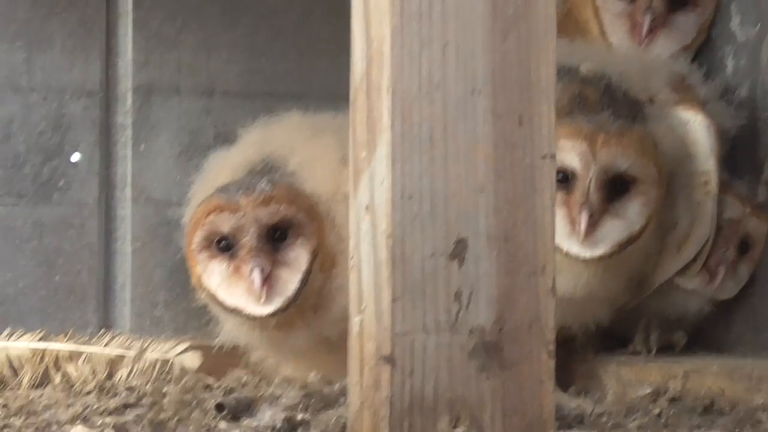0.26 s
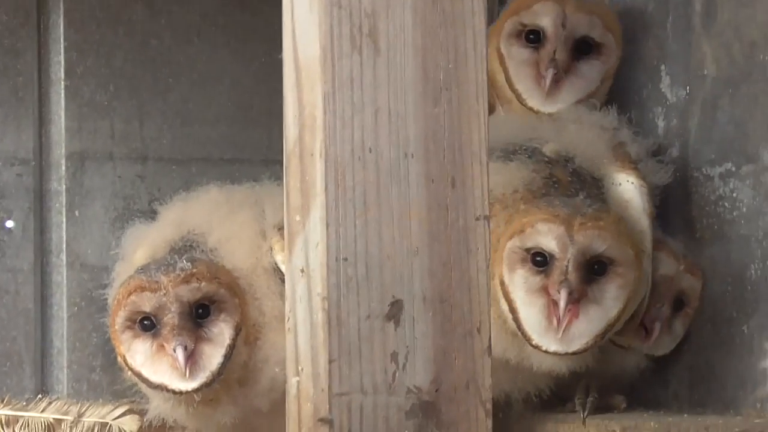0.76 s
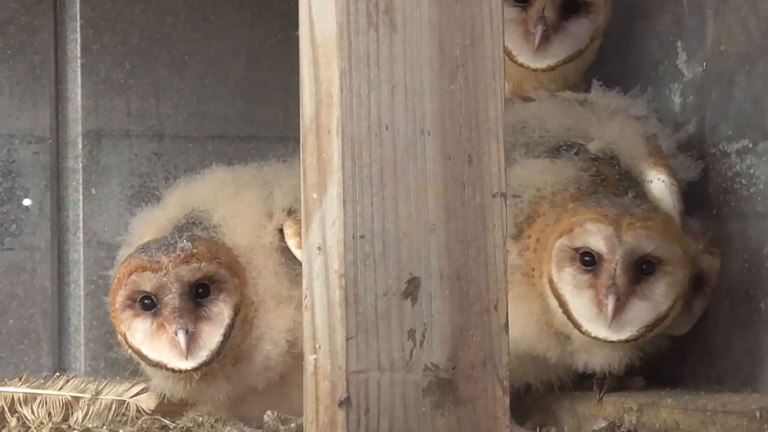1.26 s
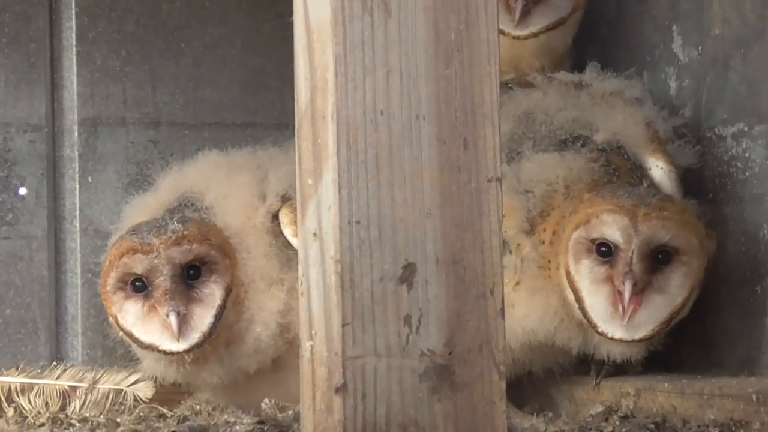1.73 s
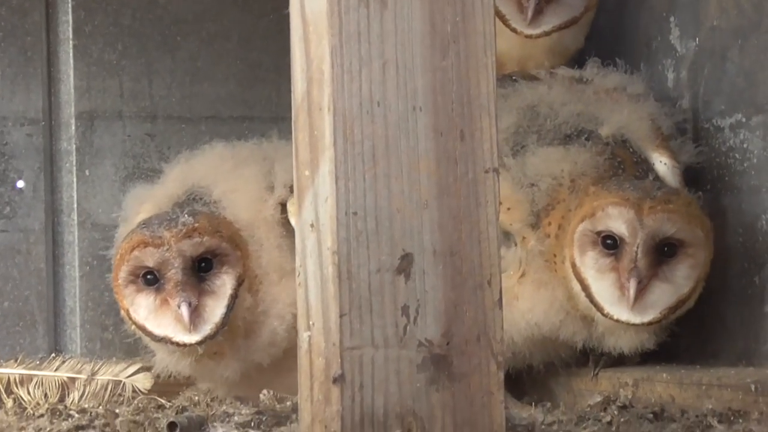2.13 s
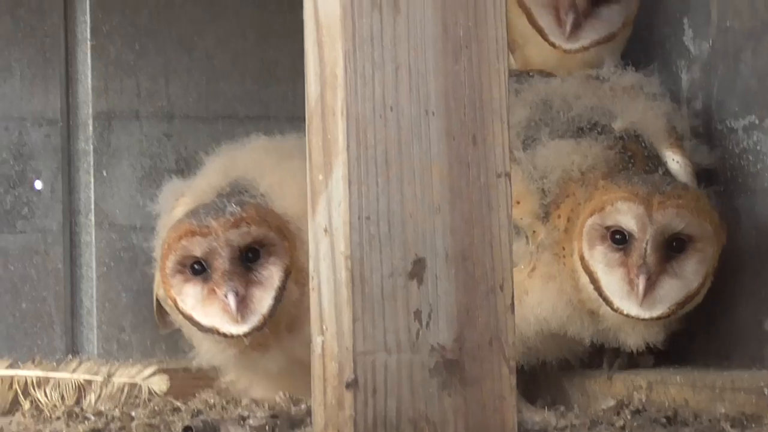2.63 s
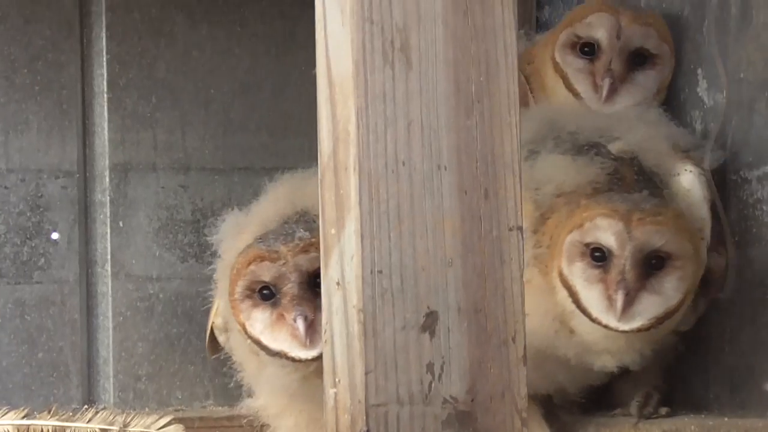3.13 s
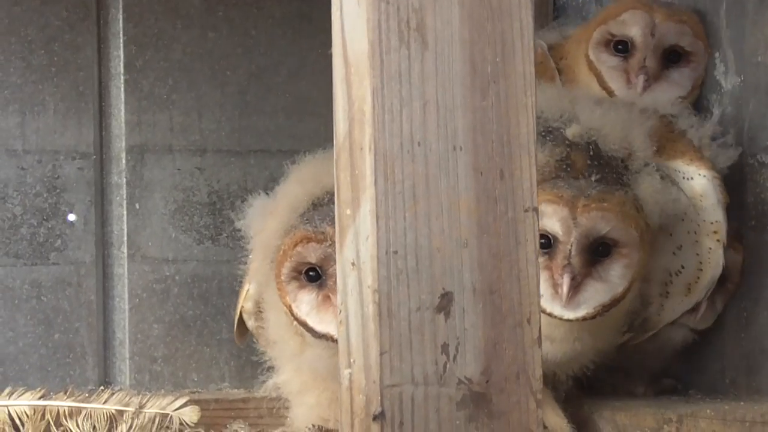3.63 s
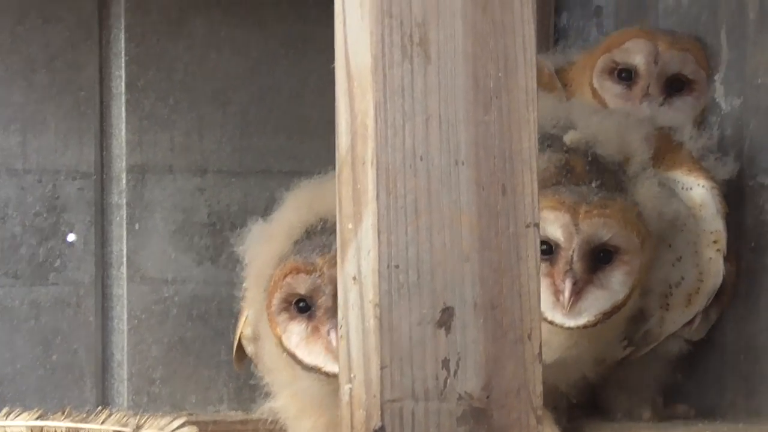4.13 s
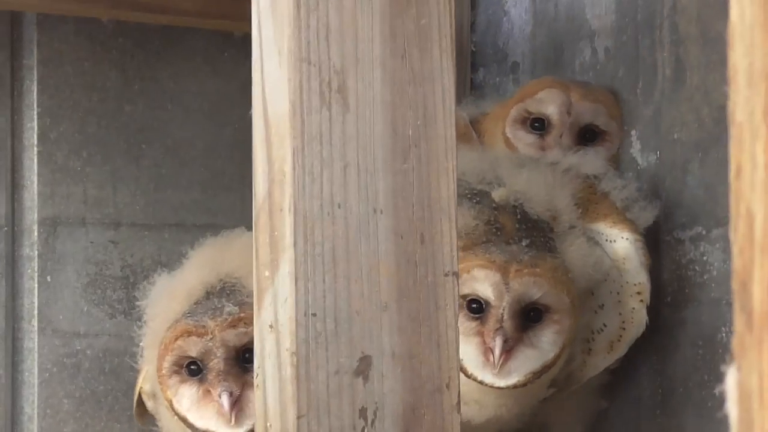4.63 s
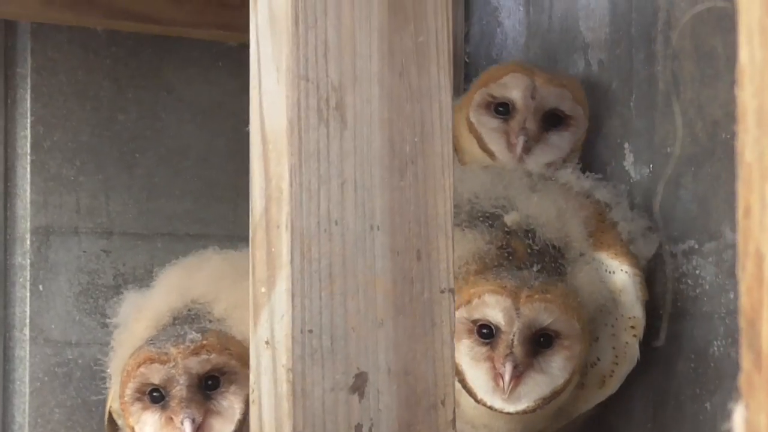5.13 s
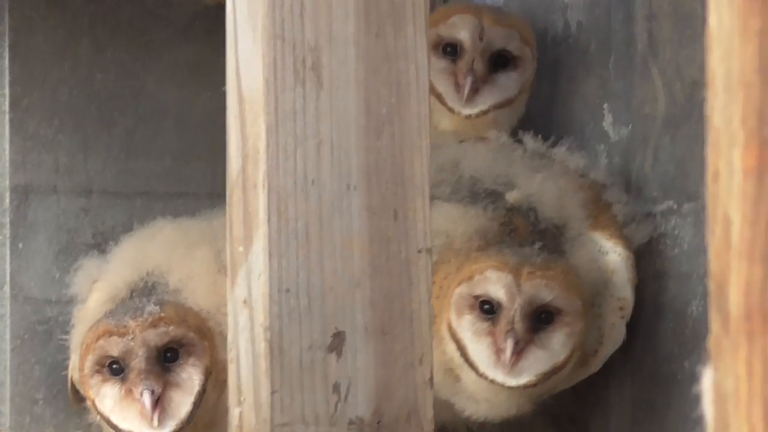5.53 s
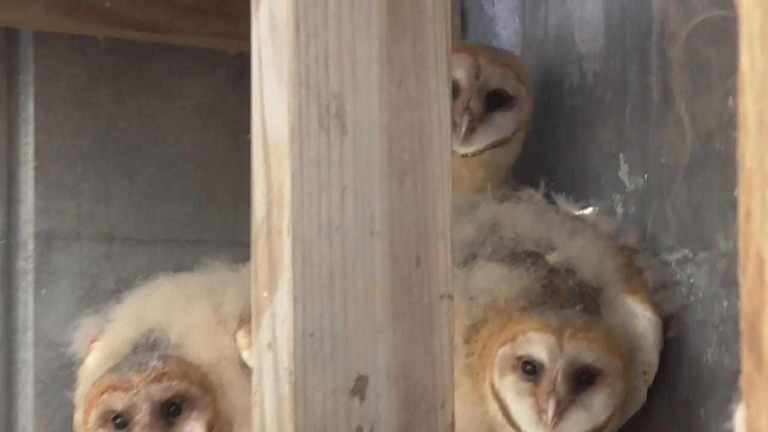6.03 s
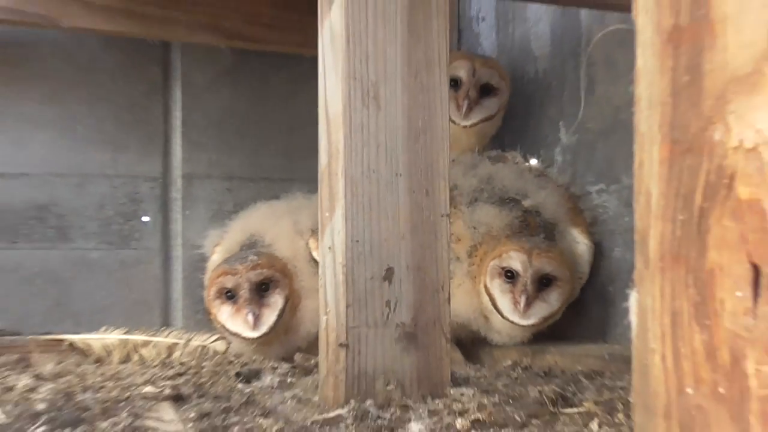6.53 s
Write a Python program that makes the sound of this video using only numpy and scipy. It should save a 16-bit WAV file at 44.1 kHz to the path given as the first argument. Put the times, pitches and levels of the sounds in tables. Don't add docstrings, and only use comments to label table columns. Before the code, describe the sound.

Raspy, airy hissing from several owlets fills a boarded space almost without pause; a beak clacks early on while low wind buffets bump underneath.

```python
import sys
import numpy as np
from scipy import signal
from scipy.fft import irfft
from scipy.io import wavfile
from scipy.ndimage import uniform_filter1d

SR = 44100
rng = np.random.default_rng(int(sys.argv[2]) if len(sys.argv) > 2 else 0)


def waveform_to_disk(signal):
    frames = np.transpose(np.atleast_2d(signal))
    scaled = np.clip(frames, -1, 1) * 32767
    samples = np.round(scaled).astype(np.int16)
    wavfile.write(sys.argv[1], SR, samples)


def boost_factor(decibels):
    exponent = np.asarray(decibels, float) / 20
    return 10 ** exponent


N = 298557
FRAME, HOP = 1024, 256
HZ = np.fft.rfftfreq(FRAME, 1 / SR)
CLOCK = np.arange(N // HOP + 5) * HOP / SR


def evened(x):
    return x / np.sqrt(np.mean(x ** 2) + 1e-20)


def read(points, hz):
    f, value = np.transpose(points)
    return np.interp(np.log(hz + 1), np.log(f + 1), value)


def noise(magnitude):
    a, b = rng.standard_normal((2, *magnitude.shape))
    white_rms = np.sqrt(FRAME / 3)
    x = signal.istft(((a + 1j * b) * magnitude).T, nperseg=FRAME, noverlap=FRAME - HOP)[1]
    return x * np.sqrt(SR / 2) / white_rms


def steady(points):
    return noise(boost_factor(read(points, HZ)) * np.ones((len(CLOCK), 1)))[:N]


def bump(hz, width_hz, shift):
    return (1 + ((HZ - hz * shift[:, None]) / width_hz) ** 2 * 1.88) ** -2


def drift(count, frames, bins):
    field = rng.standard_normal((count, len(HZ)))
    return evened(uniform_filter1d(uniform_filter1d(field, frames, 0), bins, 1))


# freq [Hz], level [dB]
WALL_HZ_DB = [(300, -12), (640, -11.5), (1400, 4.5), (2500, -8), (4500, -0.5), (7000, -3), (9000, 1.5),
              (12000, -9), (15500, 1)]


def echoes(count):
    t60_s, first_s = 0.13, .002
    t = np.arange(6000) / SR
    taps = rng.standard_normal((count, len(t))) * boost_factor(-60 * t / t60_s) * (t > first_s)
    hz = np.fft.rfftfreq(8192, 1 / SR)
    colour = np.fft.fftshift(irfft(boost_factor(read(WALL_HZ_DB, hz))))[4096 - 128:4096 + 129]
    return signal.oaconvolve(taps / np.linalg.norm(taps[0]), colour[None], "same")


def shared_echoes():
    back_s, back_db = .00625, -15
    side, centre = echoes(count=2)
    centre = 0.78 * centre
    centre[round(back_s * SR)] += boost_factor(back_db + 5)
    return np.array([centre + side, centre - side]) * 0.54


def hut(x, pan_db, echo_db, shared):
    huddle_hz = 2500
    low = signal.butter(2, huddle_hz, "low", fs=SR)
    high = signal.butter(2, huddle_hz, "high", fs=SR)
    own = signal.lfilter(*high, echoes(count=2))
    taps = boost_factor(echo_db) * (own + signal.lfilter(*low, shared))
    taps[:, 0] += boost_factor(np.array([pan_db, -pan_db]) / 2)
    return signal.oaconvolve(x[None], taps, axes=1)[:, :N] / np.sqrt(1 + boost_factor(2 * echo_db))


# freq [Hz], level [dB per Hz]
AIR_HZ_DB = [(20, -108), (60, -102), (120, -102), (190, -81), (500, -90), (2500, -100), (3300, -90.5),
             (8000, -104), (16000, -118)]


def still_air():
    return np.array([steady(AIR_HZ_DB) for _ in "lr"])


def eddies(gusts):
    count, gain_db, spread_db, share_db = 200, 0.2, 2.0, -11
    low_hz, high_hz = 95, 150
    place, size, pitch = rng.random((count, 3)).T
    at = ((np.arange(count) + place) / count * (N - 1)).astype(int)
    level_db = 20 * np.log10(gusts[at]) + gain_db + spread_db * (2 * size - 1)
    pitch_hz = low_hz + (high_hz - low_hz) * pitch
    return [(i / SR, db, hz, share_db) for i, db, hz in zip(at, level_db, pitch_hz)]


# centre_s [s], level_db [dB], pitch_hz [Hz], in_step_share_db [dB]
PUFFS = [(0.048, -27, 112, -5), (0.261, -27, 156, -7), (0.289, -21.5, 143, -3.5), (0.428, -29, 113, -5.5),
         (0.518, -24, 140, -11), (0.562, -27, 110, -7), (0.576, -18, 159, -5), (0.644, -28.5, 170, 1.5),
         (0.736, -19, 110, -6.5), (0.772, -26, 110, -4.5), (3.138, -29, 133, -13), (3.324, -22, 148, -16),
         (4.107, -23, 87, -20), (4.142, -16, 118, -21), (4.159, -26, 96, -10), (4.334, -27, 125, -13),
         (4.613, -26.5, 140, -9), (4.692, -25, 113, -17), (4.98, -26, 114, -15), (5.192, -14, 99, -17),
         (5.211, -18, 146, -11), (5.236, -9, 143, -7.5), (5.725, -25, 127, -8), (5.754, -16, 131, -17),
         (5.775, -12, 167, -11.5), (5.804, -25, 121, -4), (5.88, -24, 109, -9), (5.898, -21, 91, -12),
         (6.021, -26, 97, -14), (6.481, -16.5, 154, -7.5)]
# centre_s [s], level_db [dB], half_length_s [s]
GUSTS = [(0.05, -30, .06), (0.267, -23.5, 0.065), (0.455, -34, 0.046), (0.595, -27.5, 0.085),
         (.75, -24, 0.032), (1.1, -37, 0.092), (1.3, -43.5, .13), (2.522, -47, 0.078), (2.95, -44, 0.037),
         (3.16, -32.5, 0.056), (3.37, -33, .06), (3.647, -47, 0.075), (4.115, -31, .06), (4.29, -32, 0.072),
         (4.64, -30, 0.12), (4.928, -35.5, 0.094), (5.26, -27, 0.087), (5.505, -37.5, 0.072),
         (5.769, -20, 0.038), (5.97, -30, 0.13), (6.223, -45, 0.061), (6.494, -19.5, 0.027),
         (6.698, -45, 0.21)]
# freq [Hz], level [dB per Hz]
BUFFET_HZ_DB = [(20, -27), (55, -2), (90, 29), (130, 0), (180, 16.5), (250, 9), (400, -67), (700, -30)]


def wind():
    calm_db, puff_cycles, reach_s = -61, 1.12, .05
    rumble_db = np.array([[-4], [-13.5]])
    lump_depth_db = np.array([[4.6], [2.5]])
    t = np.arange(N) / SR
    lumps = rng.standard_normal((2, N))
    for _ in range(2):
        lumps = signal.lfilter([1], [1, -.997], lumps)
    gusts = boost_factor(calm_db) + sum(boost_factor(db) * np.exp(-((t - s) / half_s) ** 2) for s, db, half_s in GUSTS)
    rumble = np.array([evened(steady(BUFFET_HZ_DB)) for _ in "ab"])
    apart, alike = gusts * boost_factor(lump_depth_db * evened(lumps)) * rumble * boost_factor(rumble_db)
    puffs = list(PUFFS) + eddies(gusts)
    for (s, db, hz, share_db), turn in zip(puffs, rng.random((len(puffs), 2))):
        at = slice(max(round((s - reach_s) * SR), 0), round((s + reach_s) * SR))
        u = t[at] - s
        angle = 2 * np.pi * (hz * u * (1 + 9.6 * u * (turn[0] - .5)) + turn[0])
        skew = np.where(u < 0, .6, .8)
        shape = np.exp(-(u * hz / (skew * puff_cycles)) ** 2)
        crest = 0.41 * shape * np.cos(2 * angle) + 0.058 * shape ** 2 * np.cos(3 * angle)
        apart[at] += boost_factor(db - 0.5) * shape * (np.cos(angle) + crest)
        detuned = np.cos(1.068 * angle + 2 * np.pi * turn[1])
        alike[at] += boost_factor(db + 1.0 + share_db) * shape * (detuned + 0.63 * crest)
    limit = .6
    return limit * np.tanh(np.array([alike + apart, alike - apart]) / limit)


# pitch_hz [Hz], level_db [dB], t60_s [s]
SNAP_RING = [(700, -8, .025), (1100, 0, .009), (1290, -12, .04), (2266, -8, .005), (4100, -1, .004)]
# delay_s [s], level_db [dB]
SNAP_ECHOES = [(.0028, -9), (.0062, -8), (.0085, -8), (.0122, -9), (.017, -12), (.021, -15)]


def snap():
    start_s, peak_db = .8907, -5
    t, x = np.arange(3000) / SR, np.zeros(N)
    ring = sum(boost_factor(db - 60 * t / t60_s) * np.cos(2 * np.pi * hz * t) for hz, db, t60_s in SNAP_RING)
    onset = np.minimum(t / .00015 + .3, 1)
    clap = -boost_factor(peak_db) * ring / ring[0] * onset
    dull = np.convolve(clap, np.hanning(14) / 6.5, "same")
    x[round(start_s * SR):][:len(t)] = clap
    for delay_s, db in SNAP_ECHOES:
        x[round((start_s + delay_s) * SR):][:len(t)] += boost_factor(db) * dull
    return x


def opened(hz, gape):
    return gape ** np.interp(hz, (10800, 12000), [1, 0])


# time_s [s], effort_db [dB]
HISSES = [
    [(0, 2), (.5, 2), (.7, 1), (.8, -1.5), (.9, -0.5), (.94, -31)],
    [(0, 0.5), (.9, 2.5), (1.3, 0.5), (2.1, 2), (2.8, -5), (4.2, -2), (5.6, 3), (5.8, -8.5), (5.9, -38)],
    [(2, -30), (2.14, -7), (2.3, 0), (2.5, 0.5), (2.85, 2.5), (3.1, 1.5), (3.38, 0), (3.42, -10),
     (3.5, -40)],
    [(2.3, -29), (2.8, -7), (3.2, -6), (4.4, -5), (5.1, 0.5), (6.2, 2), (6.32, 1.5), (6.38, -3.5),
     (6.42, -47)],
    [(3.3, -10), (3.55, -7.5), (4.2, 1), (4.8, 3), (5.4, 1.5), (6, -0.5), (6.4, 0), (6.8, 1)],
    [(2.9, -33), (3.2, 0), (3.5, 5), (3.9, 3), (4.3, 0), (4.6, 2), (4.9, -24)],
]
# share_db [dB], share slope [dB/dB], stretch [factor], stretch slope [1/dB]
NECKS = [(1.5, -.5, 1.03, -0.07), (1, -0.85, .98, 0.0141), (1, -1.3, 0.78, 0.5), (1.5, -0.47, 1.09, 0.05),
         (-2, -0.86, 0.987, 0.12), (1, -1, 0.925, 0.05)]
# before [factor], after [factor], from_s [s], until_s [s]
GAPES = [(1.004, 1.01, 0.3, .9), (.975, 1.025, .9, 2.2), (.99, 1.04, 2.5, 3.3), (0.958, 0.988, 4, 6.3),
         (0.955, 0.988, 4.2, 5.7), (0.97, 0.963, 3.2, 4.6)]
# pitch_hz [Hz], width_hz [Hz], level_db [dB per Hz]
WINDPIPES = [
    [(1210, 280, -68), (1430, 610, -70), (2220, 250, -70)],
    [(273, 310, -75), (629, 164, -62.5), (1220, 250, -67.5), (2295, 286, -69)],
    [(775, 830, -72.5), (1320, 410, -73), (1970, 150, -80)],
    [(810, 880, -74), (1324, 510, -66), (1750, 400, -71.5)],
    [(417, 380, -67.5), (1170, 420, -76.5), (2090, 180, -76)],
    [(1407, 140, -64.5)],
]
# pitch_hz [Hz], width_hz [Hz], level_db [dB per Hz]
FIRST_BEAKS = [
    [(3900, 1500, -76.5), (5400, 740, -77.5), (6660, 540, -67.5), (7240, 300, -60.5), (8620, 560, -63.5),
     (9520, 850, -61), (10400, 1100, -68), (11500, 920, -62.5), (13800, 500, -73), (14700, 620, -77.5)],
    [(3500, 2500, -88), (4140, 880, -81.5), (5620, 1300, -81.5), (7490, 390, -76), (9370, 210, -69),
     (9650, 640, -66), (11220, 730, -70), (12120, 860, -67), (14240, 670, -79.5), (14000, 540, -93),
     (15600, 500, -89.5)],
    [(4150, 1070, -78), (5190, 280, -72), (6740, 790, -72.5), (7380, 430, -62), (8500, 300, -63),
     (9730, 550, -59), (10400, 800, -64), (12000, 1200, -73), (14200, 630, -76)],
]
# pitch_hz [Hz], width_hz [Hz], level_db [dB per Hz]
LATER_BEAKS = [
    [(3860, 1720, -74), (5600, 2100, -100), (7180, 740, -66.5), (8190, 570, -64), (9200, 890, -62.5),
     (9500, 840, -65), (11040, 790, -66.5), (11890, 360, -62), (13800, 880, -76), (15500, 600, -78)],
    [(3400, 1300, -91), (3930, 260, -77), (5500, 740, -80), (6450, 1360, -75), (7550, 500, -91),
     (8480, 1220, -63), (8770, 360, -70.5), (10300, 510, -68), (11100, 340, -67.5), (12250, 660, -74),
     (14600, 900, -79.5)],
    [(5340, 300, -73), (6830, 340, -66), (7560, 440, -66), (7950, 210, -68), (9400, 400, -74),
     (11000, 1100, -68.5), (15400, 600, -87)],
]
# pitch_hz [Hz], width_hz [Hz], depth_db [dB]
HOLLOWS = [
    [(7950, 400, -14), (3500, 200, -12), (13050, 300, -16)],
    [(8250, 800, -10), (6300, 500, -8), (13000, 300, -9), (14750, 600, -14)],
    [(7900, 400, -14), (8900, 350, -7), (13150, 350, -10), (15500, 700, -10)],
    [(13600, 500, -4)],
    [(9300, 300, -5), (6700, 250, -6), (13800, 350, -4), (4500, 400, -5), (15200, 400, -8)],
    [(5800, 500, -5)],
]


def hiss(owl):
    faint_db = -6.5
    brighten_db = 147
    hollow_follow = 1.3
    s, effort = np.transpose(HISSES[owl])
    first, last = np.searchsorted(CLOCK, [s[0], s[-1]])
    clock = CLOCK[first:last]
    effort_db = np.interp(clock, s, effort)
    push_db = np.maximum(effort_db, faint_db)
    share, share_slope, length, length_slope = NECKS[owl]
    share_db = share + share_slope * push_db
    stretch = length + length_slope * push_db
    gape = np.interp(clock, GAPES[owl][2:], GAPES[owl][:2])

    low = sum(boost_factor(2 * db) * bump(hz, width, stretch) for hz, width, db in WINDPIPES[owl])
    beak = (list(FIRST_BEAKS) + list(LATER_BEAKS))[owl]
    high = sum(boost_factor(2 * db) * bump(hz, width, opened(hz, gape)) for hz, width, db in beak)
    octaves = np.log2(np.clip(HZ / 8000, 1, 1.4))
    bright_db = brighten_db * np.outer(np.maximum(gape - 1.01, 0), octaves)
    hollow_db = sum(db * bump(hz, width, opened(hz, gape) ** hollow_follow)
                    for hz, width, db in HOLLOWS[owl])
    high = high * boost_factor(2 * (bright_db + hollow_db))

    waver_db = 0.7 * drift(len(gape), 14, 9) + 0.16 * drift(len(gape), 5, 200)
    flow = boost_factor(effort_db[:, None] + waver_db)
    breath = noise(np.sqrt(low * boost_factor(2 * share_db)[:, None] + high) * flow)
    return np.pad(breath, (first * HOP, N))[:N]


# left_minus_right_db [dB], wall_echo_db [dB]
SEATS = [(-2, -0.5), (-2, 0), (-1, -0.5), (-0.5, -0.5), (-2, -0.5), (-3.5, 2.5)]


def owls(shared):
    bass_hz = 150
    x = sum(hut(hiss(owl), *seat, shared) for owl, seat in enumerate(SEATS))
    return signal.sosfilt(signal.butter(4, bass_hz, "high", fs=SR, output="sos"), x)


def scene():
    shared = shared_echoes()
    return still_air() + wind() + hut(snap(), -1.0, -27.0, shared) + owls(shared)


# freq [Hz], left_minus_right_db [dB]
PORT_HZ_DB = [(100, 0.5), (300, -1.5), (640, -2), (1400, 2.5), (2500, 2), (7000, 0.5), (10500, 0),
              (14500, -3.5)]


def ports(dry):
    edge_hz, dip_hz, dip_width_hz, dip_db = 15780, 2830, 290, -8
    colour_db = np.outer([.5, -.5], read(PORT_HZ_DB, HZ))
    colour_db = colour_db + dip_db * bump(dip_hz, dip_width_hz, np.ones(1))
    taps = np.fft.fftshift(irfft(boost_factor(colour_db) * (HZ < edge_hz)), axes=1) * np.hanning(FRAME + 1)[:-1]
    return signal.oaconvolve(dry, taps, axes=1)[:, FRAME // 2:][:, :N]


def gate(x):
    above_hz, limit_db, band_bins = 7000, -90.5, 24
    hz, _, z = signal.stft(x, SR, nperseg=2048, scaling="psd")
    power = uniform_filter1d(2 * abs(z.mean(0)) ** 2, size=band_bins, axis=0)
    banded = np.repeat(power[band_bins // 2::band_bins], band_bins, axis=0)
    banded = banded[np.minimum(np.arange(len(hz)), 1007)]
    keep = (banded > boost_factor(2 * limit_db)) | (hz < above_hz)[:, None]
    return signal.istft(z * keep, SR, nperseg=2048, scaling="psd")[1][:, :N]


def band_limit(x):
    return signal.sosfilt(signal.butter(12, 16250, fs=SR, output="sos"), x)


def record(dry):
    return band_limit(gate(ports(dry)))


dry = scene()
out = record(dry)
waveform_to_disk(out)
```